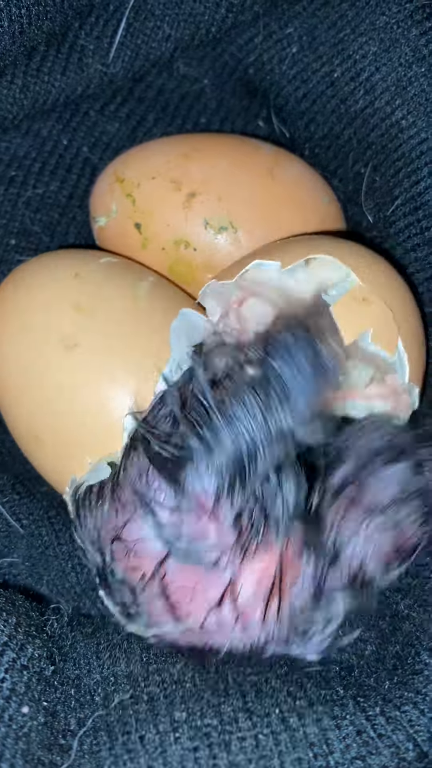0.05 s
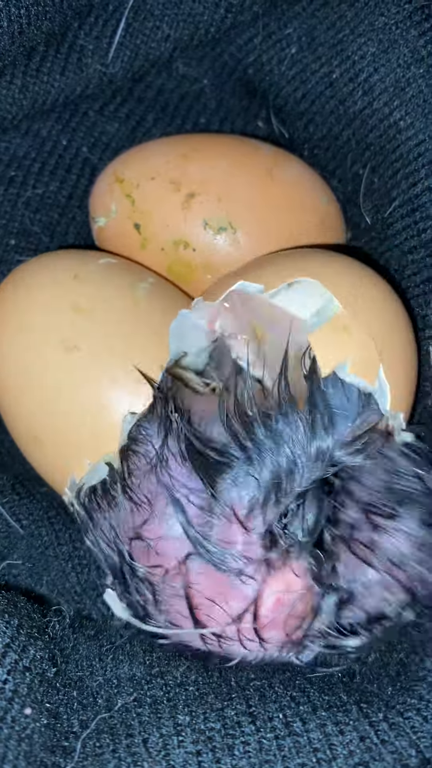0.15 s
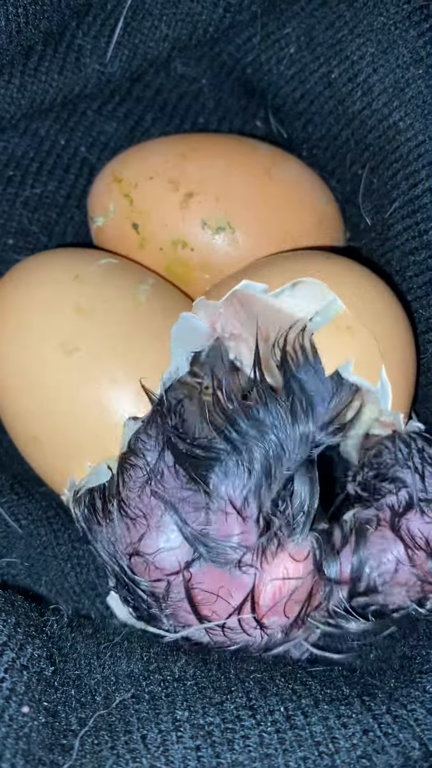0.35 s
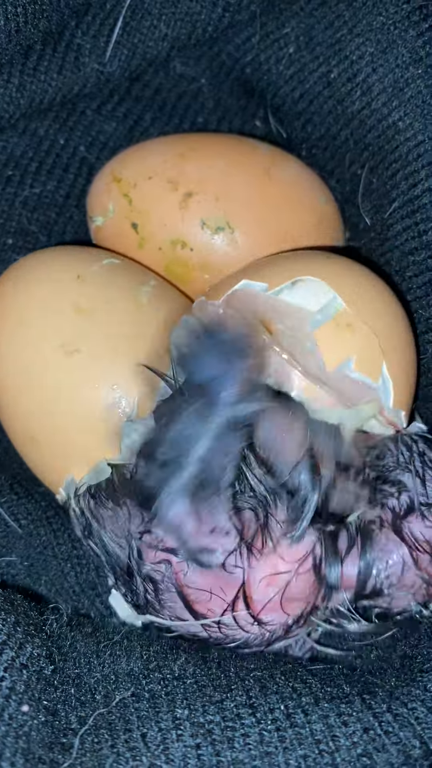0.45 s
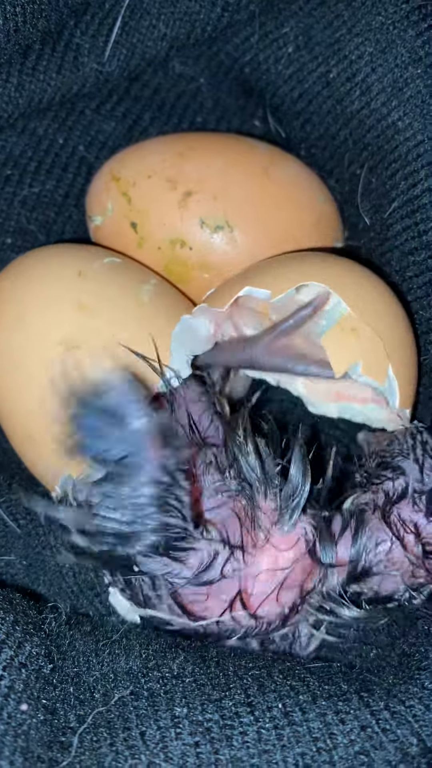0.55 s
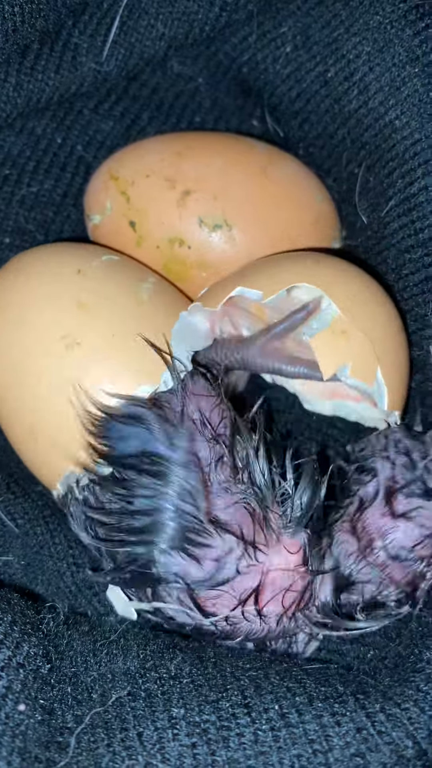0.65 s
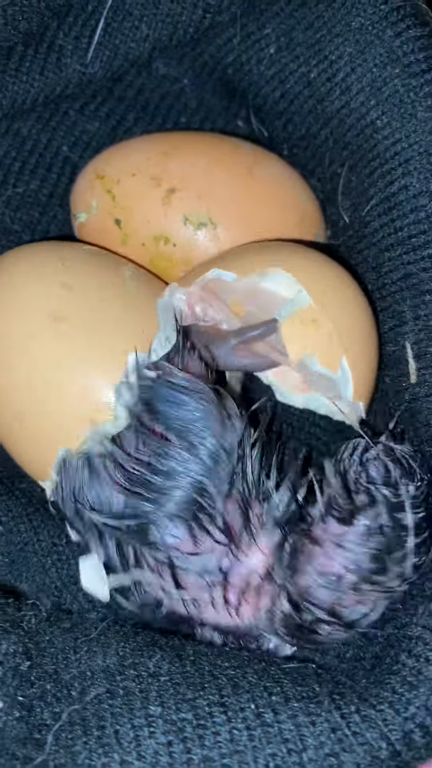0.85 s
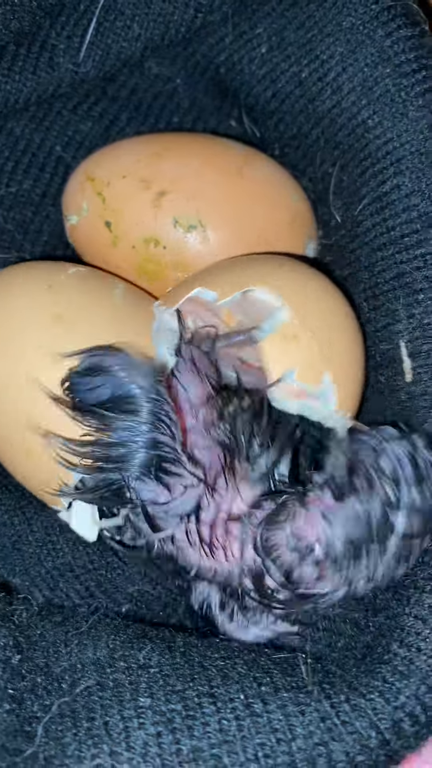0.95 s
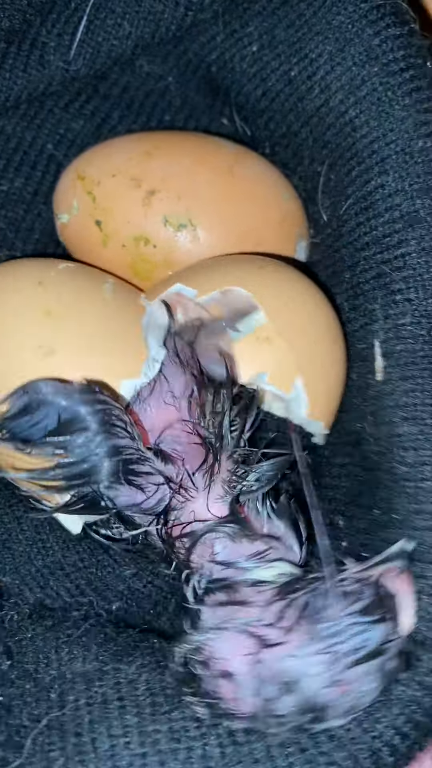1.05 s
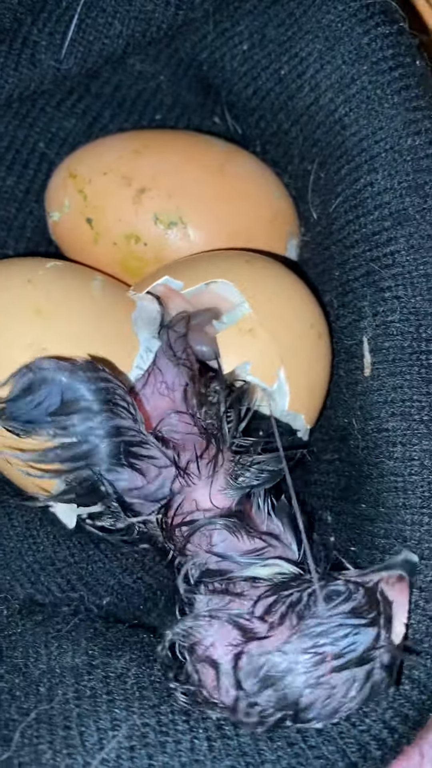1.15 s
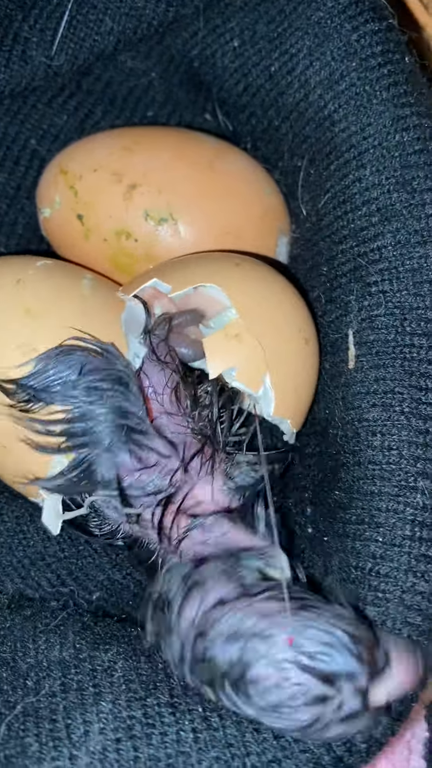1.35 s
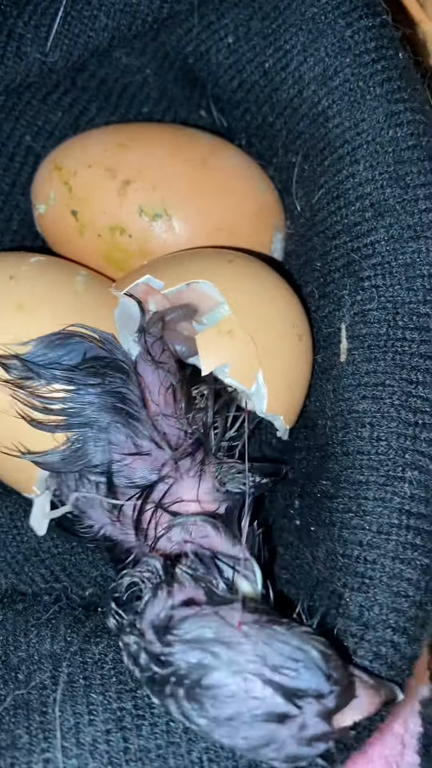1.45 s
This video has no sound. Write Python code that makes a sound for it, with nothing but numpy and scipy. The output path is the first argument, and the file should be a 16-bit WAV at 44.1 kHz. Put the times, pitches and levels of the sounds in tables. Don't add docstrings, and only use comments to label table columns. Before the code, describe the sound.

Tiny wet chick peeps twice, brief and piercing, while hollow eggshell clicks and cloth rubs nearby.

```python
import sys
import numpy as np
from scipy import signal
from scipy.fft import rfft, irfft
from scipy.io import wavfile
from scipy.ndimage import uniform_filter1d

SR = 44100
rng = np.random.default_rng(int(sys.argv[2]) if len(sys.argv) > 2 else 0)


def store_pcm(level_fs):
    pcm = np.round(np.clip(level_fs, -1, 1) * 32767).astype(np.int16)
    wavfile.write(sys.argv[1], SR, np.atleast_2d(pcm).T)


def volts_from_db(level):
    exponent = np.asarray(level, float) / 20
    return 10 ** exponent


N = 66150
T = np.arange(N) / SR


HALF_PARTIALS = (-8.5, 5.5, -13)


def phrase(rows, third_db, depth=0., swing=0., beat=0., stretch=0.):
    rows = np.array([(*row, -60)[:5] for row in rows], float)
    tracks = [np.interp(T, rows[:, 0], column) for column in rows.T[1:]]
    hz, db, second_db, half_db = (uniform_filter1d(track, size=45) for track in tracks)
    edge_s = 0.0012
    gate = np.clip(np.minimum(T - rows[0, 0], rows[-1, 0] - T) / edge_s + 0.5, 0, 1)
    phase = 2 * np.pi * np.cumsum(hz) / SR

    def snap(angle):
        return sum((0.49 * swing) ** k * np.exp(1j * (k + 1) * angle) for k in range(4))

    def air():
        return walk(1500) + 1j * walk(1500)

    rough = volts_from_db(-31.5) + volts_from_db(np.minimum(half_db, 0) - 8.5)
    throb = 1 + depth * snap(beat).real
    wobble = swing * snap(beat + 0.3).imag
    out = (throb + rough * air()) * np.exp(1j * (phase + wobble))
    haze = ring(rng.standard_normal(N), 4400, 7000)
    out += 1j * volts_from_db(-36.5) * throb * haze

    split = np.minimum(2 * depth, 1)
    upper_db = np.minimum(third_db, second_db + 4)
    overtones = [(2 + stretch, second_db)]
    overtones += [(k, upper_db - 13 * (k - 3)) for k in (3, 4, 5)]
    for k, level_db in overtones:
        pair = 1 - split + split * snap(beat + 2.2).real + 3 * rough * air()
        audible = k * hz < 0.4 * SR
        out += audible * volts_from_db(level_db) * pair * np.exp(1j * (k * phase - (k - 1) * beat))

    for k, level_db in enumerate(HALF_PARTIALS):
        breathy = 1 + 2 * rough * air()
        out += volts_from_db(half_db + level_db) * breathy * np.exp(1j * (k + 0.5) * phase)
    return gate * volts_from_db(db) * out.imag


# [t/s, pitch f/Hz, level/dB, 2nd partial level/dB, half-pitch level/dB]
TRILL = [
    (.196, 4110, -63, -38.5, -14.5),
    (.208, 4086, -42.5, -20, -7.5),
    (.222, 4166, -39.5, -25.5, -7),
    (.231, 4170, -37, -15.5, -43),
    (.25, 4380, -28.5, -9.5, -65),
    (.28, 4425, -27, -8, -61.5),
    (.291, 4310, -27, -9.5, -61.5),
    (.305, 4060, -30.5, -8, -59),
]
FALL = [
    (.305, 4040, -28.5, -20.5),
    (.317, 3957, -20.5, -32),
    (.322, 3410, -18.5, -35.5),
    (.328, 3373, -10, -22),
    (.334, 3120, -14, -16.5),
    (.341, 2957, -13.5, -12),
    (.349, 2874, -21, -6.5),
    (.357, 2523, -32, 6.5),
    (.367, 1870, -50.5, -12.5),
]
RISE = [
    (1.161, 1888, -49.5, -7, -44),
    (1.167, 2186, -39.5, 0, -28),
    (1.184, 2694, -32, 0.5, -17),
    (1.187, 2770, -34, -33, -9.5),
    (1.193, 2850, -39.5, -9, -6),
    (1.1965, 2840, -39.5, -16, -2),
]
DROP = [
    (1.1965, 4360, -28, -26, -16),
    (1.198, 4250, -43.5, -30, -6),
    (1.2005, 3600, -26, -30, -15),
    (1.204, 3780, -29.5, -26, -25),
    (1.21, 3886, -32, -37, -19),
    (1.225, 3520, -29.5, -22, -29),
    (1.23, 3214, -31, 0, -62),
    (1.235, 2550, -46, -8, -48),
    (1.238, 2196, -49.5, -20, -52),
]
# [t/s, rate f/Hz, depth/0-1, pitch swing/rad]
FLUTTER = [
    (.231, 200, 0, 0),
    (.234, 215, 0.6, 0.36),
    (.26, 362, 0.55, 0.6),
    (.277, 432, 0.5, 0.4),
    (.286, 350, .4, .9),
    (.294, 212, 0.6, 1.1),
    (.299, 104, .8, 0.76),
    (.3035, 132, 0.6, 1.2),
    (.306, 100, 0, 0),
]
THIRD_PARTIALS = (-25.5, -30.5, -6.5, -20)
# [f/Hz, left-right level/dB]
FIRST_PLACE = [
    [(2100, -2), (2800, -3), (3400, -4.5), (4400, -5), (6100, -4.5), (7500, -2), (9300, -2), (16600, 5)],
    [(2850, -4), (3350, 3.5), (4400, 2), (9000, 0.5)],
]
SECOND_PLACE = [
    [(2200, -0.5), (2600, -0.5), (3200, -3), (3800, -4.5), (4350, -6), (6200, -2.5), (9600, -3), (16600, 9)],
    [(2100, 0.5), (2480, -13.5), (2900, -3), (3800, 6), (4350, -9.5), (6000, 0.5)],
]


def peeps():
    flutter = np.array(FLUTTER)
    rate, depth, swing = (np.interp(T, flutter[:, 0], column) for column in flutter.T[1:])
    beat = 2 * np.pi * np.cumsum(rate * (T > flutter[0, 0])) / SR + 0.32
    trill = phrase(TRILL, THIRD_PARTIALS[0], np.clip(depth, 0, 1), swing, beat, 0.017)
    first = trill + phrase(FALL, THIRD_PARTIALS[1])
    second = phrase(RISE, THIRD_PARTIALS[2]) + phrase(DROP, THIRD_PARTIALS[3])

    echo_t60_s, echo_db = 0.26, -46.5
    tail = rng.standard_normal((2, 12000)) * volts_from_db(-60 * T[:12000] / echo_t60_s)
    sent = ring((first + second) * walk(900), 3000, 3000)
    echo = signal.fftconvolve(sent[None], tail, axes=1)[:, :N] * volts_from_db(echo_db) / 20
    return ports(first, FIRST_PLACE) + ports(second, SECOND_PLACE) + echo


# [peak t/s, peak level/dB, pitch f/Hz, length/ms]
KNOCKS = [(0.0013, -39, 1480, 2.4), (0.0037, -40, 1416, 2.2), (0.0067, -44, 1360, 0.62),
          (0.2073, -50, 1792, 1.0), (0.2552, -54, 1440, 0.72), (0.2615, -45, 1380, 0.79),
          (0.2651, -50, 1180, 1.7), (0.2688, -48, 1284, 0.8), (0.4685, -57, 1460, 2),
          (0.4801, -56, 1330, 2.7), (0.5649, -48.5, 1162, 1.4), (0.5703, -53, 981, 1.2),
          (0.578, -53.5, 1338, 1.7), (0.5804, -49.5, 1273, 1.1), (0.8563, -48, 1350, 1.6),
          (0.9031, -41, 1370, 1.3), (0.9057, -40, 1223, 1.36), (0.9076, -39, 1220, 1.07),
          (0.912, -32.5, 1156, 2.8), (0.9178, -41, 1270, 0.82), (0.9202, -42.5, 1083, 2.6),
          (0.9303, -43, 1230, 2.2), (0.9393, -39.5, 1483, 2.3), (0.9463, -41.5, 1210, 2.2),
          (0.9495, -42, 1240, 1.6), (0.953, -45.5, 1320, 2.9), (0.9805, -57, 1270, 2),
          (0.987, -39, 1380, 1.9), (0.99, -43, 1410, 0.86), (0.9932, -42, 1258, 1.35),
          (0.9965, -49, 1470, 1.3), (0.9987, -37.5, 1480, 0.75), (1.0022, -38, 1420, 4.2),
          (1.0056, -40, 1434, 2.1), (1.0082, -31, 1286, 0.95), (1.0158, -31.5, 1286, 0.68),
          (1.0424, -40, 1106, 1.7), (1.1125, -44, 1179, 1.8), (1.1177, -47, 1096, 2.2),
          (1.1546, -42, 1052, 1.3), (.4925, -59, 1500, 1.8), (.9705, -58, 1310, 3.6),
          (1.0135, -40, 1330, 4.7), (1.108, -53.5, 1180, 3.6)]


def knocks():
    out = np.zeros(N)
    for at, db, hz, ms in KNOCKS:
        length_s = ms / 1000
        out = bump(out, at, db, hz, 0.85 * length_s, 0.46 * length_s)
    return out


# [peak t/s, peak level/dB, pitch f/Hz]
THUDS = [(0.0026, -44, 390), (0.0113, -50, 122), (0.157, -56, 68), (0.1807, -54, 246), (0.2707, -59.5, 480),
         (0.2773, -48, 420), (0.5677, -42.5, 454), (0.5799, -49, 339.6), (0.5904, -46, 116),
         (0.6628, -54, 337.4), (0.862, -57, 90.9), (0.933, -50.5, 323), (0.944, -50.5, 243),
         (0.9546, -46.5, 92), (1.0462, -42, 286), (1.0846, -53, 51.9), (1.126, -46.5, 78.3),
         (1.155, -52, 294.3), (1.1595, -52, 328), (1.1642, -62, 322.4), (1.1827, -51, 113.7),
         (1.201, -50, 68.7), (1.2205, -48.5, 73.2), (0.43, -55, 260), (0.37, -53, 69)]


def thuds():
    out = np.zeros(N)
    for at, db, hz in THUDS:
        out = bump(out, at, db + 0.5, hz, 0.45 / hz, 0.55 / hz)
    return out


# [t/s, peak level/dB]
TICKS = [(0.171, -66), (0.1858, -51.5), (0.4707, -60), (0.478, -56), (0.4797, -44.5), (0.4815, -56),
         (0.4976, -55), (0.5662, -44), (0.579, -38.5), (0.666, -60), (0.7869, -52), (0.854, -44),
         (0.8889, -54), (0.9289, -44), (0.922, -46), (0.9384, -50.5), (0.952, -58.5), (0.988, -63),
         (1.04, -44.5), (1.149, -44), (1.3027, -53)]
# [f/Hz, level/dB per Hz]
DOWN = [(1350, -50), (2300, -12.5), (5290, 0.5), (7290, -4.5), (8960, 1), (15400, -9.5), (16500, -23)]


def ticks():
    cracks = np.zeros(N)
    length, decay_s = 400, 0.00075
    for at, db in TICKS:
        start = int(at * SR)
        noise = rng.standard_normal(length)
        cracks[start:start + length] += volts_from_db(db + 4) * noise * np.exp(-T[:length] / decay_s)
    bright = irfft(rfft(cracks) * volts_from_db(curve(DOWN)), N)
    return bright + volts_from_db(-10.5) * ring(cracks, 2000, 2900)


# [start t/s, length/s, scrape level/dB, rustle level/dB, cloth level/dB]
MOVES = [(0, 0.0068, -60, -60, -59), (0.01, .07, -80, -101, -76), (.385, 0.0367, -79.5, -76, -75),
         (1.059, 0.063, -71.5, -83, -64), (0.17, 0.042, -70.5, -61.5, -66.5),
         (0.25, 0.033, -60.5, -59, -64.5), (0.469, 0.02, -62, -65.5, -70.5),
         (0.561, 0.014, -61, -63.5, -55), (0.649, 0.0289, -66, -90.5, -65),
         (0.787, 0.058, -76.5, -73.5, -76), (0.853, 0.0234, -65, -76.5, -66), (.897, 0.06, -57.5, -70, -61),
         (0.975, 0.037, -56, -67, -70), (1.106, 0.038, -62, -81, -64.5), (1.153, 0.032, -60.5, -58, -56.5),
         (1.226, 0.068, -78.5, -100, -70.5), (1.405, .12, -81.5, -99, -74.5)]
# [f/Hz, width f/Hz, level/dB]
SHELL = [
    (1044, 880, 2.5),
    (1384, 250, -3.5),
    (717, 230, -3),
]
# [f/Hz, level/dB per Hz]
CLOTH = [(60, 0.5), (130, 3), (300, 1.5), (550, -4), (900, -27)]


def moves():
    rows = np.array(MOVES)
    since = T - rows[:, :1]
    attack = np.clip(since / 0.0013 + 1, 0, 1)
    tail = np.exp(-np.maximum(since - rows[:, 1:2], 0) / 0.015)
    scrape, rustle, cloth = volts_from_db(rows[:, 2:].T) @ (attack * tail)

    grains_per_s, spread_db = 1800, 4
    hits = rng.random(N) < grains_per_s / SR
    grains = hits * rng.standard_normal(N) * volts_from_db(spread_db * rng.exponential(size=N))
    shell = np.zeros(N)
    for hz, width_hz, db in SHELL:
        tone = grains
        for _ in range(3):
            tone = ring(tone, hz, 2 * width_hz)
        shell += volts_from_db(db) * tone

    down = colour(rng.standard_normal(N) * volts_from_db(5 * walk(210)), DOWN)
    rub = colour(rng.standard_normal(N), CLOTH) * volts_from_db(2.8 * walk(40))
    return scrape * shell / np.std(shell) + rustle * down + cloth * rub


# [f/Hz, level/dB per Hz]
ROOM = [(22, -17), (50, 5.5), (120, -6), (300, -17), (650, -29), (3000, -36.5), (10000, -45), (16000, -55)]
# [f/Hz, level/dB]
ROOM_SIDE = [(60, -24), (500, 3), (3000, 0)]


def room():
    mid = colour(rng.standard_normal(N), ROOM) * volts_from_db(1.5 * walk(14))
    side = colour(rng.standard_normal(N), ROOM)
    side = irfft(rfft(side) * volts_from_db(curve(ROOM_SIDE)), N)
    return volts_from_db(-67) * (mid + side * np.array([[1], [-1]]))


def bump(out, at, db, hz, rise_s, fall_s):
    since = T - at
    swell = np.exp(-(since / np.where(since < 0, rise_s, fall_s)) ** 2)
    return out + volts_from_db(db) * swell * np.cos(2 * np.pi * hz * since)


def ring(x, hz, width_hz):
    b, a = signal.iirpeak(hz, hz / width_hz, fs=SR)
    return signal.lfilter(b, a, x)


def walk(rate):
    k = int(SR / rate)
    steps = np.repeat(rng.standard_normal(N // k + 1), k)
    return 2.6 * uniform_filter1d(uniform_filter1d(steps, k), k)[:N]


def curve(table):
    hz, value = np.array(table, float).T
    bins_hz = np.arange(N // 2 + 1) * SR / N
    return np.interp(np.log(bins_hz + 1), np.log(hz + 1), value)


def colour(x, table):
    y = irfft(rfft(x) * volts_from_db(curve(table)), N)
    return y / np.sqrt(np.mean(y ** 2))


def ports(x, place):
    lead_rad, difference_db = place
    half = volts_from_db(curve(difference_db) / 2) * np.exp(0.5j * curve(lead_rad))
    return irfft(rfft(x) * np.array([half, 1 / half]), N)


# [f/Hz, left-right level/dB]
NEST_PLACE = [
    [(50, -.12), (280, -.33), (650, -1), (2070, -0.9), (2500, -4.2), (3880, -6), (7400, -3.8), (10500, 0.2), (16600, 5)],
    [(180, 0), (450, 2.5), (1300, 0)],
]


def scene():
    nest = ports(knocks() + thuds() + ticks() + moves(), NEST_PLACE)
    fade_out = np.clip((T[-1] - T) * 20, 0, 1)
    return peeps() + nest * fade_out + room()


def top_cut(x):
    return signal.sosfilt(signal.butter(12, 17020, fs=SR, output="sos"), x)


def record(dry):
    top_hz = 16400
    low_pass = signal.ellip(8, 0.2, 60, top_hz, fs=SR, output="sos")
    return top_cut(signal.sosfilt(low_pass, dry))


dry = scene()
out = record(dry)
store_pcm(out)
```